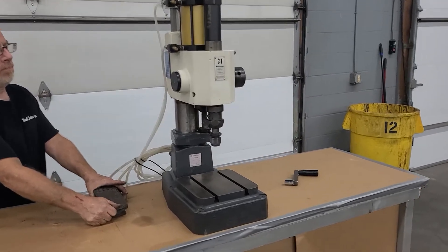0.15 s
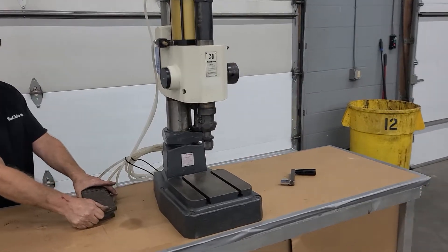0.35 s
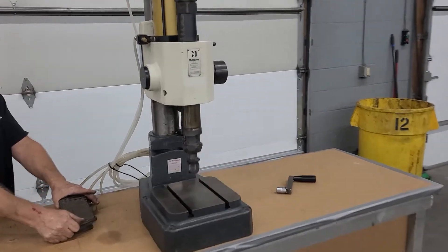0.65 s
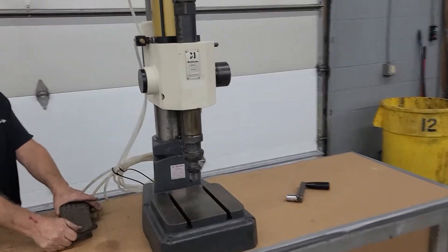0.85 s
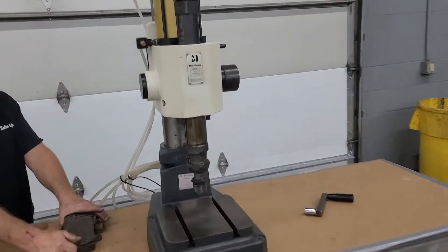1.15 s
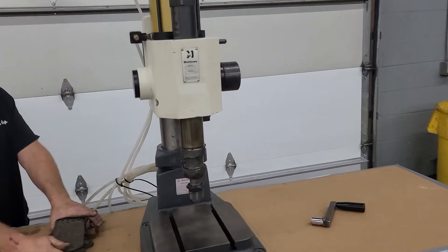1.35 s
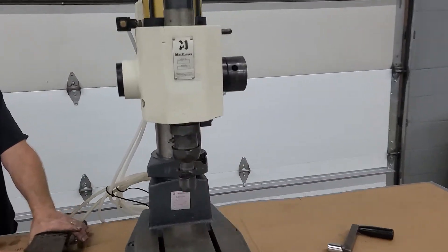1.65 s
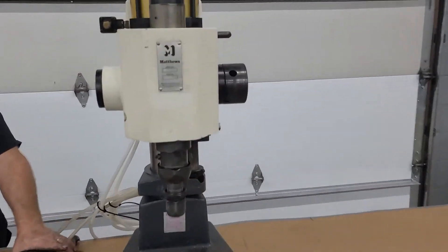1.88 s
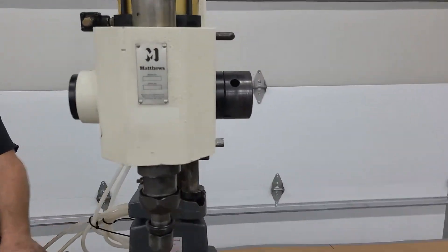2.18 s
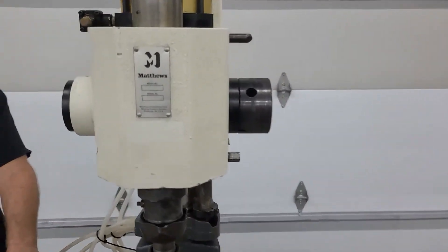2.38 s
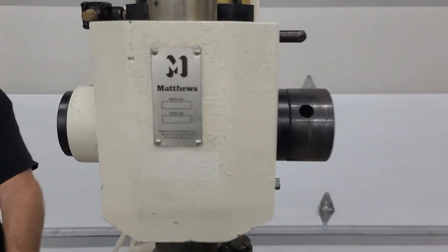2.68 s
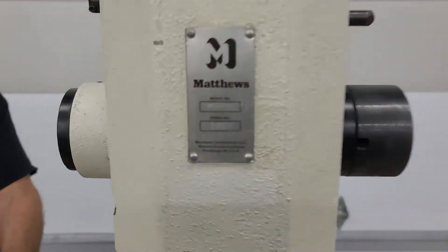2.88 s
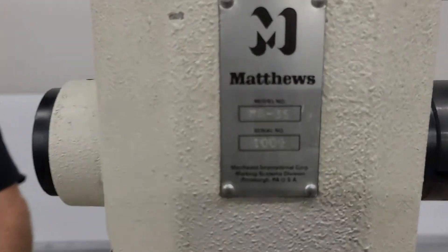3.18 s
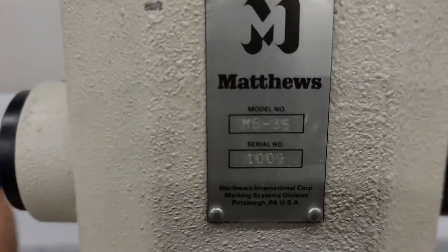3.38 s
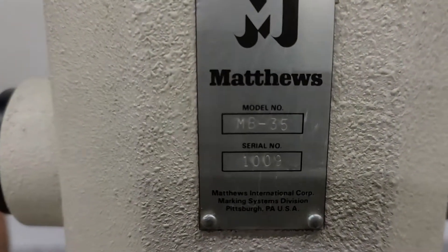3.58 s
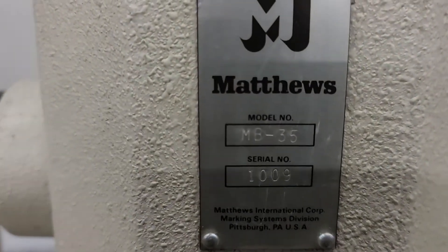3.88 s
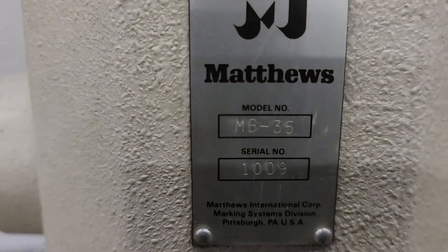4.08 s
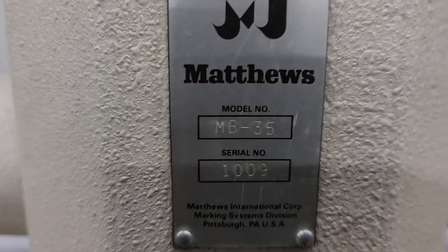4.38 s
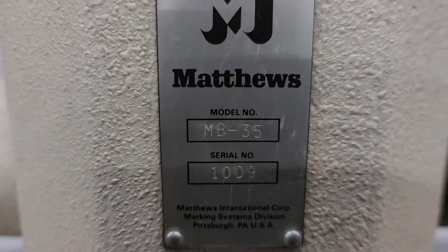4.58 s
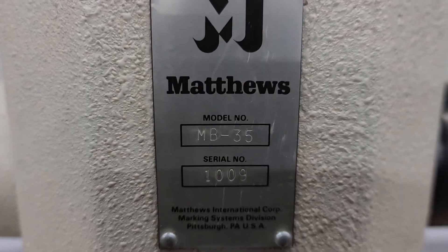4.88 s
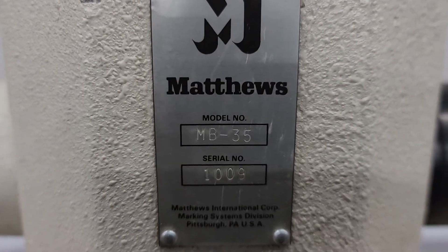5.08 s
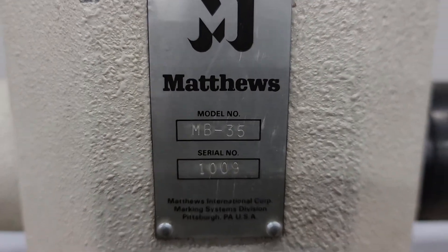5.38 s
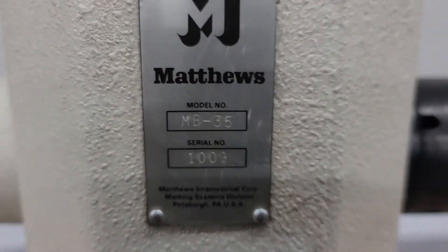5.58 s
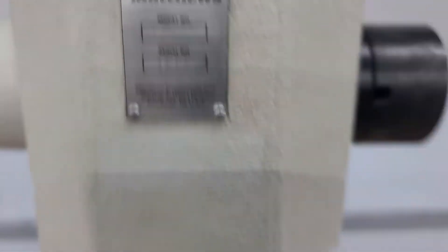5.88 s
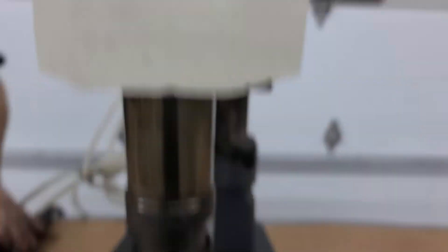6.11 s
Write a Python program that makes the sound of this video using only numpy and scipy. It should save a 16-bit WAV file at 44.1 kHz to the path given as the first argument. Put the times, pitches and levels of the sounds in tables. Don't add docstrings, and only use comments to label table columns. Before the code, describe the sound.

Compressed air bursts loudly, then a heavy steel ram clunks and clacks repeatedly amid spitting valves, bench rumble and hard hall echo.

```python
import sys
import numpy as np
from scipy import signal
from scipy.fft import rfft, irfft
from scipy.io import wavfile
from scipy.ndimage import uniform_filter1d

SR = 44100
rng = np.random.default_rng(int(sys.argv[2]) if len(sys.argv) > 2 else 0)


def waveform_to_disk(signal):
    frames = np.transpose(np.atleast_2d(signal))
    scaled = np.clip(frames, -1, 1) * 32767
    samples = np.round(scaled).astype(np.int16)
    wavfile.write(sys.argv[1], SR, samples)


def elevation(decibels):
    levels = np.asarray(decibels, float)
    return 10 ** (levels / 20)


N = 275625

# frequency in Hz, level in dB per Hz.
HUM_TONE = [(12, -25), (35, 9.5), (55, -28), (100, 13.5), (130, -12), (200, -3), (250, -21.5), (500, -29.5),
            (1700, -17), (4000, -41), (9000, -49), (16000, -45)]
OLD_RING_TONE = [(180, -64), (300, -45), (856, -6.5), (1010, -8), (2140, -5.5), (3240, -5), (16000, -44)]
HUM_DB, OLD_RING_DB = -45.5, -42.5
# frequency in Hz, t60 in seconds.
HALL_T60 = [(100, 1.44), (300, 0.72), (800, 1.77), (2000, 1.87), (5000, 1.79), (9000, 1.07), (14000, 0.64)]
# frequency in Hz, level in dB.
HALL_TONE = [(100, 13), (500, 9), (2000, 1.5), (6000, 1.5), (14000, -2.5)]
# frequency in Hz, likeness of the two sides (-1 to 1).
ALIKE = [(60, 1), (250, 1), (500, 0.94), (1000, -0.039), (1500, -0.31), (3000, 0.031), (16000, -0.032)]
# frequency in Hz, left minus right in dB.
LEAN = [(60, 0), (250, -1.5), (600, -3.5), (1500, 1.5), (5000, 1.3), (9000, 2.2), (14000, 4)]
EDGE_HZ = 15900

# start in seconds, length in seconds, level at first in dB, level at the end in dB.
STROKES = [
    (0.293, 0.68, -49, -30),
    (1.582, 0.89, -31.5, -38.5),
    (2.841, 0.52, -29, -36),
    (4.262, .4, -32, -37.5),
    (5.145, .7, -48, -43),
    (5.984, .28, -33, -41),
]
SHAKE_RISE_S, SHAKE_FALL_S, SHAKE_REST_DB = 0.081, 0.27, -50

# frequency in Hz, level in dB, t60 in seconds.
STEEL = [(630, -3, .22), (800, -4, .05), (1200, -5, .09), (1350, -6, .09), (1700, -8, .1), (2360, -7, .07),
         (2750, -7, .05)]
CASTING = [(202.6, -6.5, 0.21), (273.4, 2.5, 0.1), (354.8, 4.5, 0.06), (383.2, -4.5, 0.15),
           (475, -6, 0.025)]
BENCH = [(48, -16, .12), (72, 0, .2), (96, 0, .27), (124, -3, .27), (160, -7, .2)]

# start in seconds, crack peak in dB, crack centre in Hz, casting thud in dB, bench boom in dB.
SLAMS = [
    (2.189, -17, 600, -22, -23),
    (2.968, -11.5, 2000, -15.5, -21),
    (4.22, -14.5, 930, -24, -23.5),
    (5.037, -14, 1500, -20, -20.5),
    (5.633, -13.5, 1130, -24.5, -30),
]
STOPS = [
    (1.778, -9.5, 2290, -11, -17.5),
    (3.359, -11, 1500, -10.5, -20),
    (4.656, -7.5, 2200, -17.5, -19),
    (5.048, -16, 1500, -26, -33),
    (6.056, -7, 1500, -9, -22),
]
NUDGES = [
    (2.867, -15, 1900, -21.5, -34),
    (4.378, -16.5, 1530, -18, -35),
    (5.131, -18.5, 550, -20.5, -20.5),
    (5.543, -15.5, 1800, -26, -29.5),
    (5.575, -17.5, 1250, -18.5, -28),
    (5.971, -22, 2100, -22, -38),
]
SLAM_TICK_DB, STOP_TICK_DB, NUDGE_TICK_DB = 6, -7.5, -41.5
# start in seconds, casting thud in dB, bench boom in dB.
BUMPS = [
    (0.783, -13.5, -25),
    (0.795, -14.5, -36),
    (1.362, -34, -42),
    (1.571, -24.5, -51),
    (2.198, -18.5, -35),
    (2.844, -38.5, -33),
    (4.248, -36, -25),
    (5.153, -47, -40),
]
# start in seconds, peak in dB, pitch in Hz, t60 in seconds.
CLICKS = [(1.5922, -3, 3090, 0.016), (1.7804, -3.5, 2860, 0.033), (2.1895, -9, 3190, 0.0097),
          (4.2365, -3.5, 2050, 0.014), (4.6593, 3, 2760, 0.01), (5.0343, -7, 2100, 0.012),
          (5.542, -12, 2570, 0.013), (5.683, -14, 1960, 0.012), (2.19, -7, 756, .055),
          (3.361, -11, 2140, .035), (4.221, -10, 958, .045), (5.635, -6, 880, 0.034),
          (5.971, -17.5, 2960, 0.035)]

# start in seconds, length in seconds, fizz once open in dB, fizz before closing in dB,
# pipe roar relative to the fizz in dB.
SEEP = [
    (.17, 0.14, -78.5, -50.5, 26.2),
]
BLOW = [
    (.24, .755, -18, -17, -0.85),
]
PUFFS = [
    (1.44, .1, -24, -9.5, -10),
    (1.54, .05, -34, -34, 1),
    (2.759, .079, -10.5, -9.5, -11),
    (3.222, .13, -14, -11, -11),
    (4.185, .05, -29, -22, -3),
    (5.496, .049, -17, -13, -8),
    (5.855, .09, -27, -13.5, -7),
]
VENTS = [
    (2.187, .26, -19, -43, 1.5),
    (4.212, .12, -18.5, -24, 1),
    (5.033, .155, -18, -21, -3.5),
    (5.638, .11, -29, -34, 1),
]
FILLS = [
    (1.605, .17, -38, -35, 10),
    (1.82, .36, -44, -47, 9),
    (2.89, .075, -46, -31, 6),
    (5.68, .28, -44, -46, 8),
    (5.985, .068, -47, -35, 6),
]
DRIVES = [
    (2.975, .065, -24, -27, 2.5),
    (3.02, .2, -49, -65, 21),
    (4.255, .4, -29, -32, 5),
]
LEAKS = [
    (4.68, .34, -38, -36.5, -3),
    (5.69, 0.16, -63, -43, -10),
]
# frequency in Hz, level in dB per Hz.
SEEP_TONE = [(1500, -40), (2200, -8), (2900, 0), (3500, -14), (5000, -34), (16000, -30)]
BLOW_TONE = [(320, -13), (550, -16.5), (900, -7), (2000, 1.5), (3300, -5.5), (4300, -7), (6500, -8.5),
             (10500, -10.5), (13500, -7), (16000, -8)]
PUFF_TONE = [(300, -40), (600, -13), (1000, -6), (2000, -2), (3100, -4), (4300, -11), (5800, -7),
             (7300, -4), (11000, -5), (14500, 0), (16000, 1)]
VENT_TONE = [(290, -5), (500, -1.5), (1400, 1), (2010, 5), (2500, 0.5), (3490, -3.5), (4400, -9.5),
             (9090, -15), (10400, -14.5), (14900, -6), (16000, -25.5)]
FILL_TONE = [(350, -45), (600, -1), (2070, 14.5), (3390, 0.5), (3890, -12), (5120, -21), (5710, -20),
             (8740, -34.5), (16000, -30)]
DRIVE_TONE = [(350, -11), (600, -11), (894, -13), (1010, -9.5), (1190, -9), (1960, -5), (2900, -12.5),
              (9490, -23.5), (13800, -17.5), (16000, -16)]
LEAK_TONE = [(600, -25), (1200, -10), (2700, -2), (3600, -14), (5500, -20), (10500, -24), (13000, -16),
             (16000, -10)]
# frequency in Hz, width in Hz, level over the hiss in dB.
BLOW_PIPES = [(950, 250, 4), (2450, 300, -6), (2950, 450, 6), (3520, 250, 3), (4300, 450, -4),
              (4950, 400, 5), (7500, 400, 3), (9120, 350, 6), (12300, 500, 7), (15300, 500, 4)]
PUFF_PIPES = [(3100, 700, 2), (4300, 700, -5), (9300, 900, 2)]
VENT_PIPES = [(2960, 2400, 10.6), (9300, 500, 6.3)]
FILL_PIPES = [(1070, 180, 1), (8600, 400, 4.4)]
DRIVE_PIPES = [(1580, 120, 3), (1770, 170, 8)]
LEAK_PIPES = [(6500, 450, 12), (14000, 600, 7), (15400, 500, 6)]
# opening in seconds, closing in seconds, fizz when nearly shut in dB,
# roar gained by the end in dB.
SEEP_VALVE = (.01, .01, -6, 0)
BLOW_VALVE = (.09, .065, -26, 0)
PUFF_VALVE = (.026, .02, -28, 1.5)
VENT_VALVE = (.011, .06, -16, 5)
FILL_VALVE = (.011, .006, -8, -1.5)
DRIVE_VALVE = (.006, .025, -10, -1.5)
LEAK_VALVE = (.015, .06, -9, -1.5)
# time in seconds, level in dB.
WHISTLE = [
    (1.594, -24.5),
    (1.7, -39),
    (2.05, -42),
]
WHISTLE_HZ, WHISTLE_WIDTH_HZ = 5050, 95


def evened(x):
    return x / np.sqrt(np.mean(x ** 2) + 1e-20)


def read(points, hz):
    f, value = np.transpose(points)
    return np.interp(np.log(hz + 1), np.log(f + 1), value)


def add(mix, s, sound):
    part = mix[..., round(s * SR):][..., :sound.shape[-1]]
    part += sound[..., :part.shape[-1]]


def level(rows, offset_db=0):
    s, db = np.transpose(rows)
    return elevation(np.interp(np.arange(N) / SR, s, db, -120, -120) + offset_db)


def paired(noise, alike):
    return np.sqrt(alike) * noise[0] + np.sqrt(1 - alike) * noise[1:]


def heard(x, size):
    return np.array([x[0], np.roll(x[1], size)])


def diffuse(db, size, hop_s):
    hz = np.fft.rfftfreq(size, 1 / SR)
    t = np.arange(N * 4 // size + 5) * hop_s
    a, b, c, d = rng.standard_normal((len(t), len(hz), 4)).T
    same = np.clip(read(ALIKE, hz), -1, 1)[:, None]
    left = a + 1j * b
    right = same * left + np.sqrt(1 - same ** 2) * (c + 1j * d)
    field = np.array([left, right]) * elevation(db(hz[:, None], t))
    return signal.istft(field, nperseg=size, noverlap=3 * size // 4)[1][:, :N]


def workshop():
    hum = diffuse(lambda hz, t: read(HUM_TONE, hz) + 0 * t, size=2048, hop_s=512 / SR)
    old = diffuse(lambda hz, t: read(OLD_RING_TONE, hz) - 60 * t / read(HALL_T60, hz), size=512, hop_s=128 / SR)
    return elevation(HUM_DB + 3.5) * evened(hum) + elevation(OLD_RING_DB) * old / np.std(old[:, :8000])


def hall(x):
    tail = diffuse(lambda hz, t: read(HALL_TONE, hz) - 60 * t / read(HALL_T60, hz), size=256, hop_s=64 / SR)
    tail = tail[:, :2 * SR]
    tail = tail * np.clip((np.arange(2 * SR) / SR - .006) / 0.0024, 0, 1)
    return signal.fftconvolve(x[None], tail / np.linalg.norm(tail[0]), axes=1)[:, :N]


def travel():
    gain = elevation(SHAKE_REST_DB)
    for s, length, first_db, last_db in STROKES:
        end = s + length
        gain = gain + level([(s - SHAKE_RISE_S, SHAKE_REST_DB), (s, first_db), (end, last_db),
                             (end + SHAKE_FALL_S, SHAKE_REST_DB)])
    return gain


def shake():
    hz = np.fft.rfftfreq(N, 1 / SR)
    bench = sum(elevation(db) / np.hypot(1, (hz - f) * t60 / 0.68) for f, db, t60 in BENCH)
    casting = sum(elevation(db) / np.hypot(1, (hz - f) * t60 / 3.7) for f, db, t60 in CASTING)
    gain = (bench + elevation(-16.5) * casting) / (1 + (hz / 500) ** 2)
    rub = paired(rng.standard_normal((3, N)), .8)
    return elevation(-5.5) * travel() * evened(irfft(rfft(rub) * gain, N))


def ring(modes, length_s, luck):
    t = np.arange(round(length_s * SR)) / SR
    hz, db, t60 = np.transpose(modes)[:, :, None]
    luck = luck[:len(modes), None]
    decay = elevation(db + 2 * luck - 60 * t / t60)
    partials = decay * np.sin(2 * np.pi * hz * (1 + .012 * luck) * t + luck)
    sound = partials.sum(0) * (1 - np.exp(-t * hz.mean() * 3))
    return sound / abs(sound).max()


def thump(body, s, thud_db, boom_db, luck):
    add(body, s + 0.00083, elevation(thud_db + 2.5) * ring(CASTING, 0.41, luck[10:]))
    add(body, s + 0.0019, elevation(boom_db + 5) * ring(BENCH, 0.64, luck[20:]))


def knocks():
    steel, body = np.zeros((2, N)), np.zeros(N)
    t = np.arange(6000) / SR
    kinds = (SLAMS, SLAM_TICK_DB), (STOPS, STOP_TICK_DB), (NUDGES, NUDGE_TICK_DB)
    rows = [(*row, row[1] + tick_db) for table, tick_db in kinds for row in table]
    luck = rng.standard_normal((len(rows), 30))
    grit = rng.standard_normal((len(rows), 2, 3, 6000))
    high = signal.butter(2, 4000, "high", fs=SR)
    contact = t / .0025 * np.exp(1 - t / .0025)
    rebound = elevation(-12) * np.roll(contact, 560) + elevation(-17) * np.roll(contact, 950)
    scatter = elevation(-7) * np.exp(-t / .012) * (1 - np.exp(-t / .003))
    blow = contact + rebound + scatter
    for (s, crack_db, centre_hz, thud_db, boom_db, tick_db), lot, (a, b) in zip(rows, luck, grit):
        wide = signal.butter(3, [centre_hz / 2.2, centre_hz * 1.9], "band", fs=SR)
        crack = signal.lfilter(*wide, paired(a, .8) * blow)
        tick = signal.lfilter(*high, paired(b, 0.11)) * contact
        add(steel, s, elevation(crack_db + 6.5) * crack / abs(crack).max())
        add(steel, s + 0.00211, elevation(crack_db - 9.5) * ring(STEEL, .3, lot))
        add(steel, s, elevation(tick_db - 8) * tick)
        thump(body, s, thud_db, boom_db, lot)
    for row, lot in zip(BUMPS, rng.standard_normal((len(BUMPS), 30))):
        thump(body, *row, lot)
    return steel, body


def clicks():
    spool = np.zeros((2, N))
    for (s, db, hz, t60), lot in zip(CLICKS, rng.standard_normal((len(CLICKS), 3))):
        modes = [(hz * .88, -3, t60), (hz, 0, t60), (hz * 1.15, -3, t60)]
        add(spool, s, elevation(db) * ring(modes, .05, lot))
    return spool


def whistle():
    r = np.exp(-np.pi * WHISTLE_WIDTH_HZ / SR)
    poles = [1, -2 * r * np.cos(2 * np.pi * WHISTLE_HZ / SR), r * r]
    return level(WHISTLE, -2.2) * evened(signal.lfilter([1], poles, rng.standard_normal(N)))


def opening(row, valve):
    start, length, open_db, end_db, roar_db = row
    rise, fall, shut_db, gain_db = valve
    s = start + np.array([0, rise, max(length - fall, rise), max(length, 2 * rise)])
    fizz_db = [open_db + shut_db, open_db, end_db, end_db + shut_db]
    return np.transpose([s, fizz_db, roar_db + gain_db * (s - start) / length])


def jet(rows, tone, pipes=(), flutter_db=1.07, split_hz=5000):
    s, fizz_db, roar_db = np.transpose(rows)
    t = np.arange(s[0], s[-1], 1 / SR)
    hz = np.fft.rfftfreq(len(t), 1 / SR)
    gain = elevation(read(tone, hz) - 80 * (hz < 300))
    for f, width, db in pipes:
        gain = gain * (1 + (elevation(db) - 1) / (1 + (2 * (hz - f) / width) ** 2))
    noise = rfft(rng.standard_normal((3, len(t)))) * gain
    low = 1 / (1 + (hz / split_hz) ** 8)
    roar = evened(irfft(paired(noise, .72) * low, len(t)))
    fizz = evened(irfft(paired(noise, .55) * (1 - low), len(t)))
    flutter = elevation(flutter_db * evened(uniform_filter1d(rng.standard_normal(len(t)), size=200)))
    flow = elevation(np.interp(t, s, fizz_db)) * (fizz + elevation(np.interp(t, s, roar_db)) * roar)
    edges = np.minimum(1, np.minimum(t - t[0], t[-1] - t) / .003)
    return t[0], flow * flutter * edges


def air():
    valve, head = np.zeros((2, 2, N))
    for rows, moves, tone, pipes, mix in (
            (SEEP, SEEP_VALVE, SEEP_TONE, (), valve),
            (BLOW, BLOW_VALVE, BLOW_TONE, BLOW_PIPES, valve),
            (PUFFS, PUFF_VALVE, PUFF_TONE, PUFF_PIPES, valve),
            (VENTS, VENT_VALVE, VENT_TONE, VENT_PIPES, valve),
            (FILLS, FILL_VALVE, FILL_TONE, FILL_PIPES, valve),
            (DRIVES, DRIVE_VALVE, DRIVE_TONE, DRIVE_PIPES, head),
            (LEAKS, LEAK_VALVE, LEAK_TONE, LEAK_PIPES, valve)):
        for row in rows:
            add(mix, *jet(opening(row, moves), tone, pipes))
    return valve + whistle(), head


def scene():
    valve, head = air()
    steel, body = knocks()
    body = body + shake()
    direct = heard(valve + clicks(), size=11) + heard(steel, size=6) + heard(head, size=19) + heard(body, size=7)
    to_hall = valve[0] + head[0] + elevation(-11.0) * steel[0] + elevation(-8.5) * body[0]
    return direct + elevation(-9.5) * hall(to_hall) + workshop()


def top_cut(x):
    return signal.sosfilt(signal.butter(12, 16970, fs=SR, output="sos"), x)


def record(dry):
    hz = np.fft.rfftfreq(N, 1 / SR)
    colour = elevation(read(LEAN, hz) * np.array([[.5], [-.5]]))
    band = np.maximum(1 / (1 + (hz / EDGE_HZ) ** 200), elevation(-53))
    x = irfft(rfft(dry) * colour * band, N)
    return top_cut(np.tanh(x))


dry = scene()
out = record(dry)
waveform_to_disk(out)
```